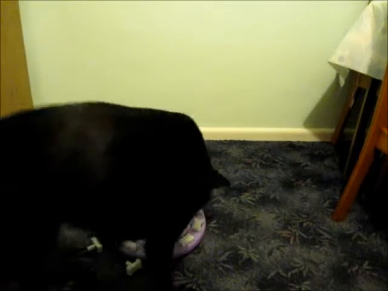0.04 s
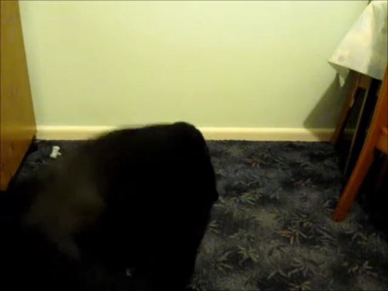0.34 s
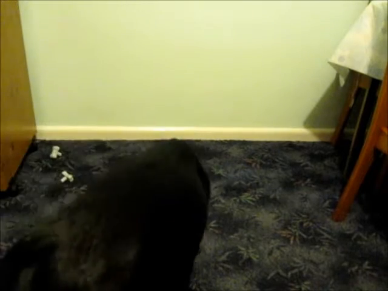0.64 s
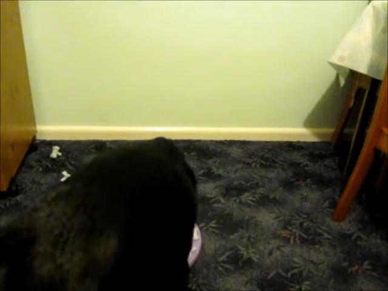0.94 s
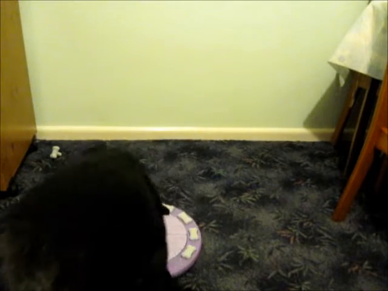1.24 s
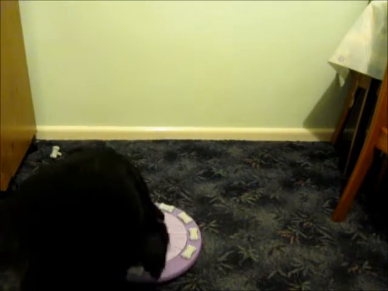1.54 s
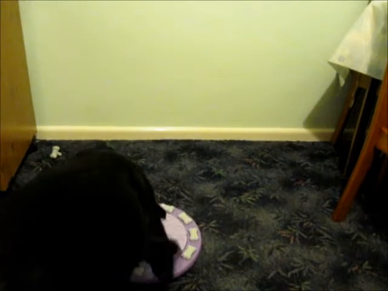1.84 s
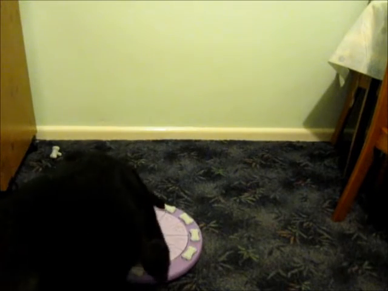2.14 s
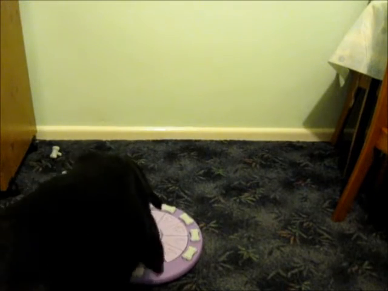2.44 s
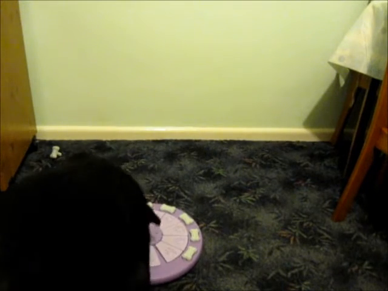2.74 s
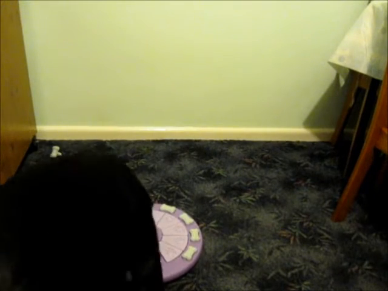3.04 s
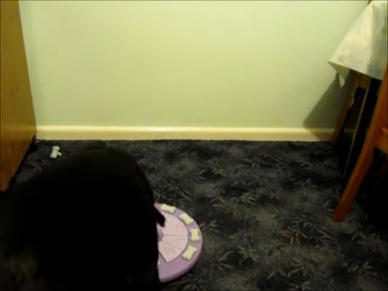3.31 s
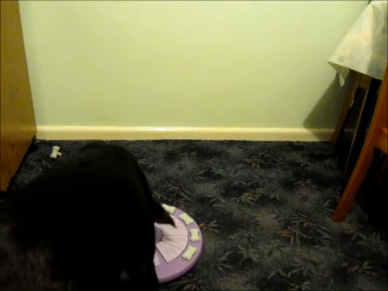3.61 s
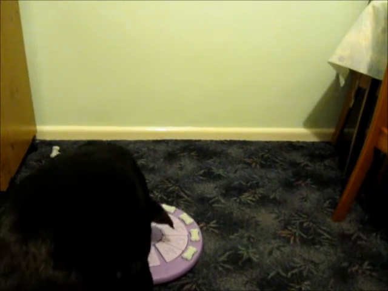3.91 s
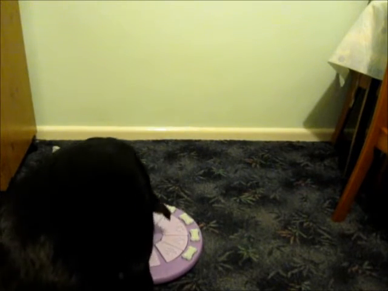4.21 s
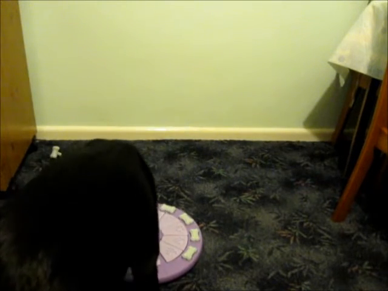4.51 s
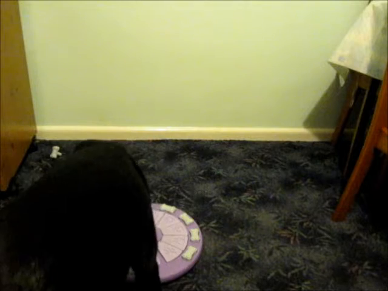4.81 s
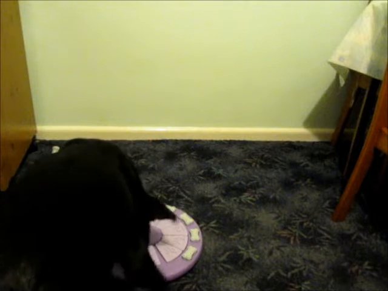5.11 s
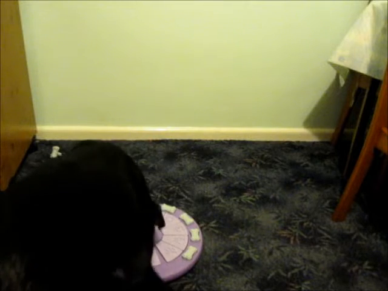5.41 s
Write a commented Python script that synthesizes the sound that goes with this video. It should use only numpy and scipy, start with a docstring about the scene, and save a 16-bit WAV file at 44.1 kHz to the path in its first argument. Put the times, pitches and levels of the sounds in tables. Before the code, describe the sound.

A hard plastic puzzle toy clatters and rasps in two bursts as a dog works it, over a faint steady camera whine.

```python
"""A small carpeted room, heard close up on a camera's microphone; the camera's motor whines throughout.
A dog works a round, hard plastic puzzle toy in two busy spells, up to 0.9 s and from 1.7 to 2.9 s.
Paw and nose knock the hollow tray and drag the sliders, which rasp in their tracks and snap against
their stops; pegs clack on the shell, and dull low thumps sound under some of the loud knocks.
A few soft nudges follow just after 3 s, then a faint thump at 5 s and a last nudge near 5.5 s."""
import sys
import numpy as np
from scipy import signal
from scipy.fft import rfft, irfft
from scipy.io import wavfile

SR = 44100
rng = np.random.default_rng(int(sys.argv[2]) if len(sys.argv) > 2 else 0)


def store_wav(level_fs):
    """Save 16-bit WAV to argv[1]."""
    pcm = np.round(np.clip(np.atleast_2d(level_fs), -1, 1) * 32767)
    wavfile.write(sys.argv[1], SR, pcm.T.astype(np.int16))


N = 249606
TIME = np.arange(N) / SR

# the toy's four registers (body, shell, rim, edge): low_hz, high_hz, slide_share_db
REGISTERS = [(229, 1490, -2), (1200, 2440, -1), (2730, 5750, -11), (6130, 10730, -21)]
BODY, SHELL, RIM = range(3)


def from_db(db):
    return 10 ** (np.asarray(db) / 20)


def rms_one(x):
    return x / np.sqrt(np.mean(x ** 2) + 1e-20)


def at_hz(points, hz):
    """Reads a table on a log-frequency axis."""
    points = np.array(points)
    return np.interp(np.log(np.maximum(hz, 1)), np.log(points[:, 0]), points[:, 1])


def band(x, low, high):
    """Causal band-pass."""
    return signal.sosfilt(signal.butter(3, [low, high], "band", fs=SR, output="sos"), x + 1e-18)


def resonance(x, hz, width_hz):
    """Two-pole resonance with gain 1 at its peak."""
    radius = np.exp(-np.pi * width_hz / SR)
    feedback = [1, -2 * radius * np.cos(2 * np.pi * hz / SR), radius ** 2]
    return signal.lfilter(np.array([1, 0, -1]) * (1 - radius ** 2) / 2, feedback, x)


def pulse_of(spectrum, size=8192):
    """The shortest causal pulse that has this spectrum."""
    gains = from_db(at_hz(spectrum, np.linspace(0, SR / 2, size // 2 + 1)))
    cepstrum = irfft(np.log(gains))
    cepstrum[1:size // 2] *= 2
    cepstrum[size // 2 + 1:] = 0
    return irfft(np.exp(rfft(cepstrum)))


def grains(size, per_s, spread_db):
    """Tiny contacts at random moments, of uneven strength."""
    born = rng.random(size) < per_s / SR
    signs = rng.choice([-1, 1], size)
    return born * signs * from_db(spread_db * np.minimum(rng.exponential(1, size), 4))


def hiss(level_db):
    """Steady noise floor of room and camera."""
    # colour of the hiss: frequency_hz, density_db
    spectrum = [(20, -5.5), (45, -2), (180, -3.5), (260, 2), (480, -1), (1000, 4), (1450, 0.5),
                (2400, -2.5), (3300, -5.5), (4300, -10), (7000, -14), (9400, -17.5), (10400, -12),
                (11000, -35)]
    return from_db(level_db) * rms_one(signal.fftconvolve(rng.standard_normal(N), pulse_of(spectrum))[:N])


def camera(whine_db, flutter, hum_hz, hum_db):
    """Right at the microphone: motor noise in the case, a whine wavering with its speed, mains hum."""
    # resonances of the camera case: centre_hz, width_hz, level_db
    case_modes = [(1148, 158, -45.5), (1298, 84, -49.5), (2800, 380, -55.5), (4940, 640, -57)]
    # tones of the motor: pitch_hz, level_db
    motor_tones = [(263.8, -59.5), (441.4, -59.5), (1179, -50.5), (1292, -49.5), (1319, -50.5), (1351, -48),
                   (1577, -68), (1604, -55), (1863, -68), (1895, -61.5), (2121, -62), (2153, -63.5),
                   (2180, -61), (2439, -84), (2466, -62), (2579, -59.5), (2724, -69.5), (3262, -70.5),
                   (3521, -62.5), (3806, -67.5), (4409, -68.5), (4969, -67), (5862, -63.5), (7854, -63.5)]
    case = 0
    for hz, width_hz, db in case_modes:
        ringing = resonance(rng.standard_normal(N), hz, width_hz)
        case += from_db(db) * rms_one(resonance(ringing, hz, width_hz))
    drift = np.interp(TIME * 12, np.arange(200), rng.standard_normal(200))   # 12 new speeds a second
    motor_time = TIME + flutter * np.cumsum(drift) / SR
    whine = sum(from_db(db + whine_db) * np.sin(2 * np.pi * (hz * motor_time + rng.random()))
                for hz, db in motor_tones)
    hum = from_db(hum_db) * np.sin(2 * np.pi * hum_hz * TIME)
    return case + np.sqrt(2) * (whine + hum)


def room(direct, wet_db, build_s, size=26000):
    """Behind the direct sound, dense reflections from near walls build quickly and die band by band."""
    # decay of the room: frequency_hz, t60_s
    decay_times = [(200, 0.26), (700, 0.35), (2000, 0.42), (5000, 0.3), (11000, 0.37)]
    t, edges_hz = np.arange(size) / SR, np.geomspace(120, 13000, 9)
    tail = 0
    for low, high in zip(edges_hz, edges_hz[1:]):
        t60 = at_hz(decay_times, np.sqrt(low * high))
        tail += band(rng.standard_normal(size), low, high) * from_db(-60 * t / t60)
    tail *= 1 - np.exp(-(t / build_s) ** 2)
    return direct + from_db(wet_db) * signal.fftconvolve(direct, tail / np.linalg.norm(tail))[:N]


def low_thumps(low_hz, high_hz, decay_s, size=8820, onset_samples=880):
    """Dull, quickly dying low thumps under some of the loud knocks, and a faint one alone at 5 s."""
    # low thumps: start_s, level_db
    thumps = [(0.209, -43), (0.327, -33), (0.366, -37), (1.742, -37), (1.899, -35), (1.945, -31),
              (1.972, -40), (2.512, -35), (2.575, -41), (5.013, -43.5)]
    out, t = np.zeros(N + size), np.arange(size) / SR
    for start_s, db in thumps:
        thump = band(rng.standard_normal(size) * np.exp(-t / decay_s), low_hz, high_hz)
        at = int(start_s * SR)
        out[at:at + size] += from_db(db) * thump / np.std(thump[:onset_samples])
    return out[:N]


def toy_response(ring_db):
    """One tap on the toy: a dry crack plus the ringing tray, split into the four registers."""
    # broad colour of the plastic: frequency_hz, level_db
    plastic = [(150, -13.5), (250, -15), (370, -6), (500, 3), (900, 2), (1400, -5.5), (2200, -11.5),
               (3300, -7.5), (5000, -12.5), (6500, -21), (10000, -20.5), (11500, -33.5)]
    # modes of the hollow tray: pitch_hz, level_db, t60_s
    tray_modes = [(247, 7.5, 0.11), (315, 2.5, 0.054), (510, -21, 0.25), (528, 3.5, 0.18),
                  (584.2, 5.5, 0.11), (667, 1, 0.021), (770, -4, 0.028), (818, -9, 0.063), (918, 3, 0.032),
                  (885, -24, 0.086), (1026, 9, 0.24), (1100, 8.5, 0.039), (1287, 4.5, 0.021),
                  (1440, -16, 0.058), (1568, 3.5, 0.077), (1670, -27, 0.14), (1945, -4.5, 0.12),
                  (1940, -2, 0.019), (2196, -3, 0.46), (2380, -9, 0.054), (2800, 3, 0.05), (3310, -14, 0.1),
                  (3340, -4, .08), (3820, 8, 0.094), (4760, -10, 0.04), (5030, -26, 0.092)]
    crack = pulse_of(plastic)
    rings = sum(from_db(db) * resonance(crack, hz, np.log(1000) / (np.pi * t60))
                for hz, db, t60 in tray_modes)
    return [band(crack + from_db(ring_db) * rings, low, high) for low, high, _ in REGISTERS]


def stroke(start_s, length_s, attack_s=0.0041, sag_db_per_s=15.5, release_s=0.025):
    """Envelope of one push: the slider breaks loose at once, the push eases, it coasts to rest."""
    t = np.maximum(TIME - start_s, 0)
    attack = np.minimum(t / attack_s, 1)
    release = np.exp(-np.maximum(t - length_s, 0) / release_s)
    return attack * from_db(-sag_db_per_s * t) * release


def slider_rasp(response, level_db, neutral_brightness_db):
    """Sliders stick and slip in their tracks; a quicker stroke is brighter."""
    # strokes of the sliders: start_s, length_s, pressure_db, brightness_db, shell_bite_db
    strokes = [(0.243, 0.25, -14, -10.5, -1), (0.602, 0.11, -14, -10, 3.5), (0.696, 0.17, -14, -8.5, -1.5),
               (0.897, 0.041, -24.5, 0.5, -7), (1.767, 0.15, -20.5, -16.5, 1), (1.9, .19, -11.5, -12.5, 0),
               (2.142, 0.029, -20, -6, 5.5), (2.354, 0.12, -13.5, -13, 0), (2.531, 0.033, -11.5, -10.5, 1),
               (2.619, 0.13, -14.5, -5.5, -1.5), (2.778, .11, -19, -1, -1)]
    tilt = np.array([-0.61, 0.26, 1.05, 1.42])   # dB in each register per dB of brightness
    shares_db = np.array([share_db for _, _, share_db in REGISTERS])
    power = 0
    for start_s, length_s, db, brightness_db, bite_db in strokes:
        levels_db = db + level_db + shares_db + tilt * (brightness_db - neutral_brightness_db)
        levels_db[SHELL] += bite_db
        power += np.outer(from_db(levels_db), stroke(start_s, length_s)) ** 2
    slips = rms_one(grains(N, per_s=1600, spread_db=2.0))
    return sum(signal.fftconvolve(slips * pressure, register / np.linalg.norm(register))[:N]
               for register, pressure in zip(response, np.sqrt(power)))


def soft_nudges(chatter_s=0.013, ring_db=20, q=7.1):
    """Contacts so gentle that they only set the tray ringing."""
    # nudges: start_s, strength_db, panel_hz
    nudges = [(0.558, -38, 955), (1.01, -40, 580), (1.28, -36, 1140), (1.372, -28.5, 634),
              (3.155, -43, 504), (3.255, -36, 526), (3.293, -31.5, 533), (3.322, -41, 580),
              (5.457, -21, 894), (5.46, -18.5, 638), (5.476, -22.5, 595)]
    colour_db = np.array([0, -11.5, -38, -30])
    for start_s, db, panel_hz in nudges:
        yield start_s, db + colour_db, chatter_s, (BODY, panel_hz, ring_db, q)


def peg_clacks(peg_hz=1670, ring_db=-3, q=2.6):
    """Contacts of the pegs on the shell, with a broad midrange ring."""
    # clacks: start_s, strength_db, chatter_s
    clacks = [(0.6097, -13, 0.0036), (0.832, -21.5, .018), (0.902, -27.5, 0.012), (1.943, -20.5, 0.048),
              (1.9658, -18.5, 0.0009), (1.9839, -14.5, 0.0037), (2.455, -21, .013), (2.5749, -12.5, 0.0017)]
    colour_db = np.array([-4, 1.5, -7.5, -17])
    for start_s, db, chatter_s in clacks:
        yield start_s, db + colour_db, chatter_s, (SHELL, peg_hz, ring_db, q)


def slider_snaps(usual_rim_hz=3150, edge_db_per_octave=18.5, ring_db=-1, q=7.3):
    """Contacts of the sliders with their stops ring the rim; a higher snap has more edge."""
    # snaps: start_s, strength_db, chatter_s, rim_hz
    snaps = [(0.2381, -27, 0.075, 4450), (0.302, -19.5, 0.0071, 3250), (0.316, -20, 0.0048, 4450),
             (0.6947, -21.5, 0.0058, 4830), (1.7405, -20, 0.012, 3100), (2.3345, -17.5, 0.024, 3240),
             (2.5135, -10.5, 0.0047, 3450), (2.606, -28.5, .006, 4080), (2.619, -21, 0.028, 4180),
             (2.8158, -15, 0.0056, 4500)]
    for start_s, db, chatter_s, rim_hz in snaps:
        edge_db = edge_db_per_octave * np.log2(rim_hz / usual_rim_hz)
        colour_db = np.array([-11.5, -10, 0.5, -13.5 + edge_db])
        yield start_s, db + colour_db, chatter_s, (RIM, rim_hz, ring_db, q)


def tray_knocks(ring_db=9, q=6.4):
    """Contacts of paw and nose with the tray; a harder knock favours the upper registers."""
    # knocks: start_s, strength_db, hardness_db, chatter_s, panel_hz
    knocks = [(0.122, -35, 6, .03, 1120), (0.2089, -12, -7.5, 0.011, 790), (0.2144, -19, 2, 0.025, 1030),
              (0.2362, -23, 12, 0.0044, 950), (0.302, -16, -10, 0.031, 810),
              (0.3226, -14.5, 1, 0.0054, 890), (0.354, -16.5, 1.5, 0.022, 720), (0.366, -19, 5, 0.017, 640),
              (0.4567, -13, -7.5, 0.0018, 865), (0.589, -22.5, 11.5, 0.02, 650),
              (0.601, -19.5, -20.5, 0.005, 905), (0.6945, -9.5, -2, 0.0032, 1110),
              (0.768, -15, 3, 0.016, 800), (1.7409, -17, 2, 0.016, 830), (1.751, -14, -2.5, 0.016, 824),
              (1.791, -18, -0.5, 0.022, 855), (1.817, -17, -4, 0.0048, 1090), (1.897, -14, 7, 0.015, 1080),
              (1.919, -22, -5, 0.015, 540), (1.976, -17.5, -1, 0.0045, 550), (2.138, -20.5, 2, 0.0092, 660),
              (2.147, -15, -1.5, 0.0081, 606), (2.166, -20.5, -2, 0.012, 730),
              (2.343, -18.5, 3.5, 0.036, 880), (2.353, -13, -3.5, 0.0063, 1020),
              (2.381, -20.5, 5.5, .008, 734), (2.533, -25, -7, .018, 810), (2.565, -11.5, -1, 0.015, 704),
              (2.629, -26, -3, 0.006, 550), (2.776, -12.5, 3.5, 0.016, 600), (5.452, -26.5, -2, 0.012, 905)]
    # gain per dB of hardness: body_db, shell_db, rim_db, edge_db
    hardness_tilt = [-0.44, 0.52, .8, 1]
    colour_db = np.array([-1.5, -6, -10.5, -22])
    for start_s, db, hardness_db, chatter_s, panel_hz in knocks:
        levels_db = db + colour_db + hardness_db * np.array(hardness_tilt)
        yield start_s, levels_db, chatter_s, (BODY, panel_hz, ring_db, q)


def strike_toy(response, contacts, first_touch_db, level_db, size=11025, onset_samples=530):
    """Each contact drives the four registers with one firm touch and a dying chatter of loose parts."""
    out, t = np.zeros(N + size), np.arange(size) / SR
    for start_s, levels_db, chatter_s, (struck, ring_hz, ring_db, q) in contacts:
        force = grains(size, per_s=2200, spread_db=1.0) * np.exp(-t / max(chatter_s, 1e-3))
        force /= np.sqrt(np.sum(force ** 2) + 1e-20)
        force[0] += from_db(first_touch_db) * np.exp(-chatter_s / 0.022)   # a slow shove starts softly
        hits = [signal.fftconvolve(force, register)[:size] for register in response]
        # the part under the contact adds its own ring
        hits[struck] += from_db(ring_db) * resonance(hits[struck], ring_hz, ring_hz / q)
        at = int(start_s * SR)
        for hit, db in zip(hits, levels_db):
            out[at:at + size] += from_db(db + level_db) * hit / np.std(hit[:onset_samples])
    return out[:N]


def scene():
    """The toy close by in the small room, over the hiss and the camera's own noise, in mono."""
    response = toy_response(ring_db=-7.0)
    contacts = [*tray_knocks(), *peg_clacks(), *slider_snaps(), *soft_nudges()]
    hits = strike_toy(response, contacts, first_touch_db=-5.5, level_db=-1.0)
    rasp = slider_rasp(response, level_db=-6.0, neutral_brightness_db=-9.5)
    thumps = low_thumps(low_hz=230, high_hz=343, decay_s=0.0092)
    toy = room(hits + rasp + thumps, wet_db=-8.0, build_s=0.0046)
    background = hiss(level_db=-44.5) + camera(whine_db=-2.0, flutter=0.0005, hum_hz=100, hum_db=-65)
    return (toy + background)[None]


def record(dry):
    """The sharpest peaks overload the microphone input and are rounded off; the top treble is cut."""
    ceiling, cutoff_hz = 0.85, 11100
    clipped = dry / (1 + (dry / ceiling) ** 8) ** (1 / 8)
    return signal.sosfiltfilt(signal.ellip(8, .1, 45, cutoff_hz, fs=SR, output="sos"), clipped)


dry = scene()
out = record(dry)
store_wav(out)
```